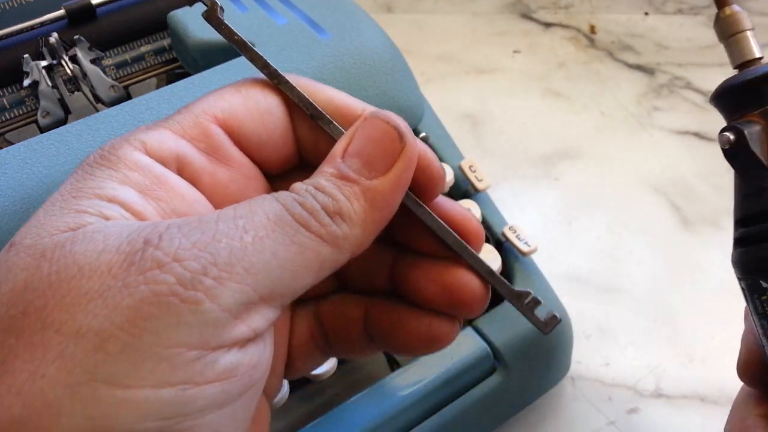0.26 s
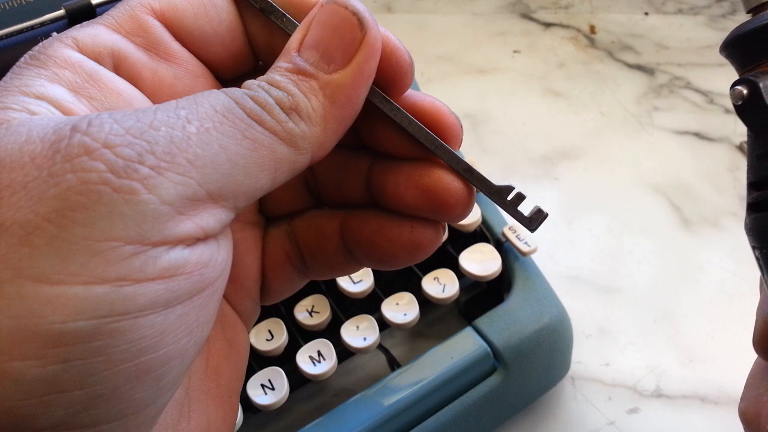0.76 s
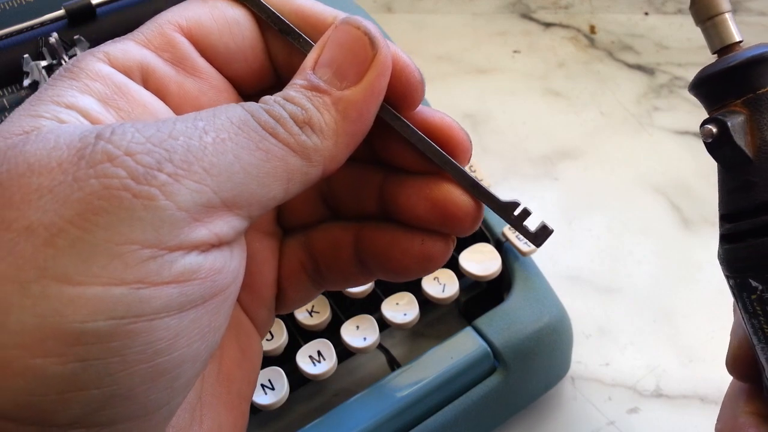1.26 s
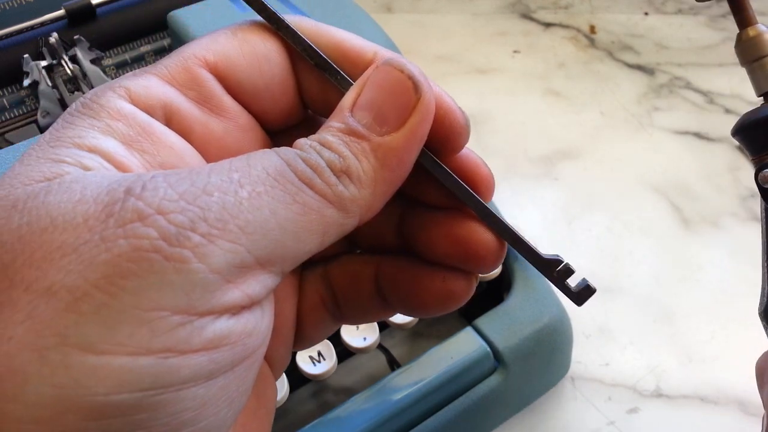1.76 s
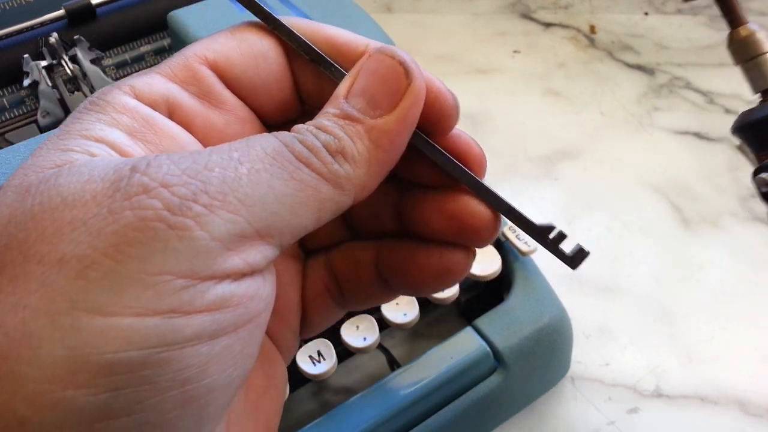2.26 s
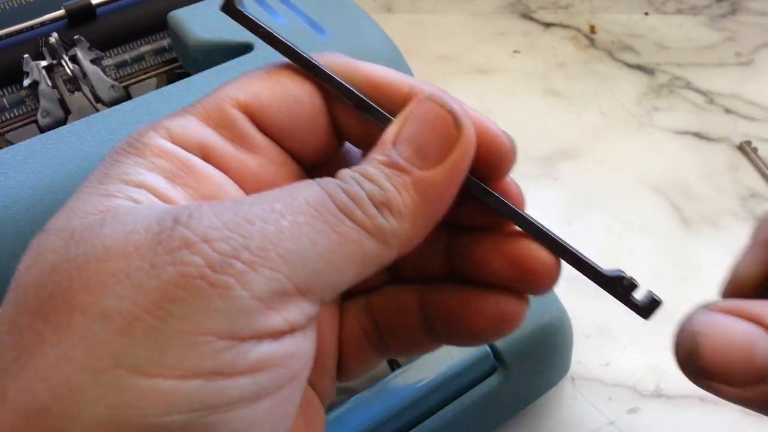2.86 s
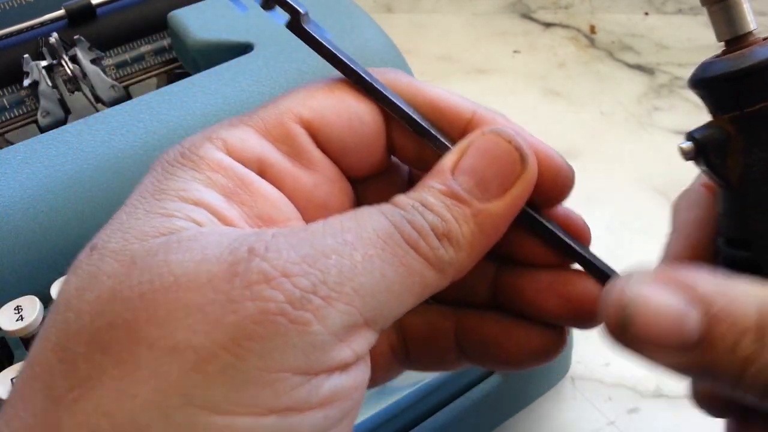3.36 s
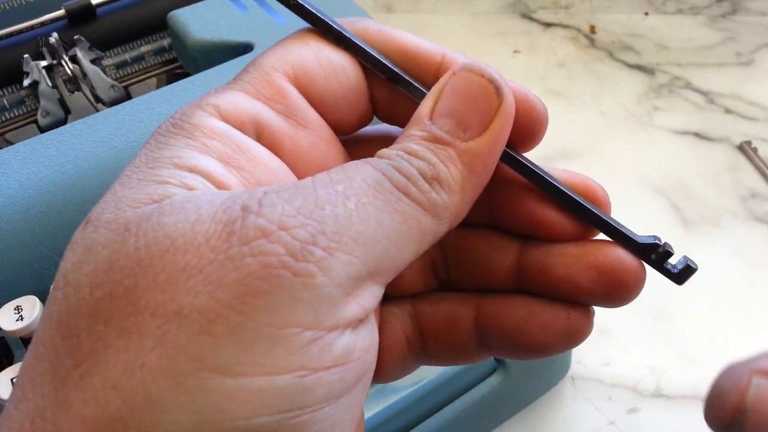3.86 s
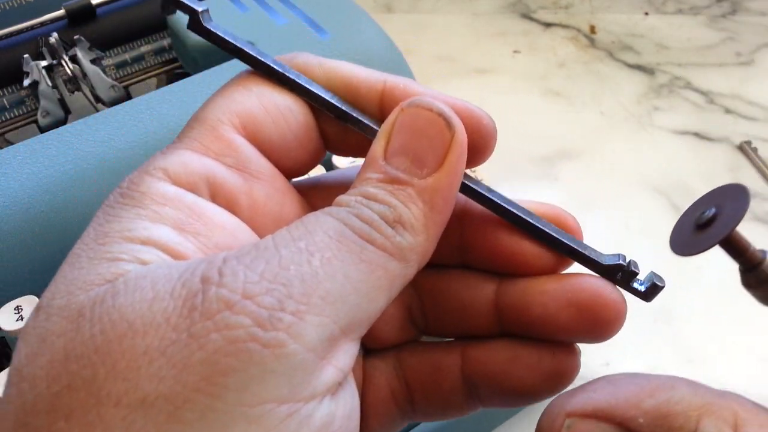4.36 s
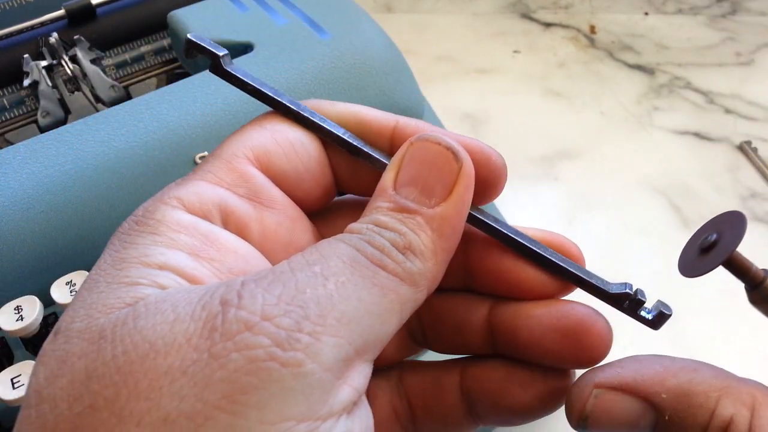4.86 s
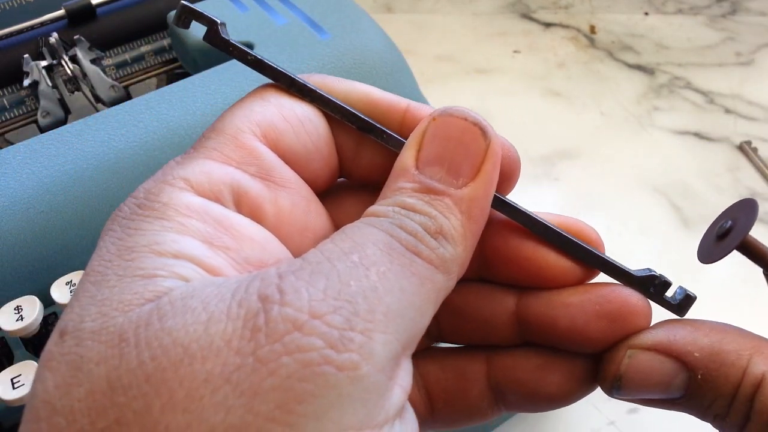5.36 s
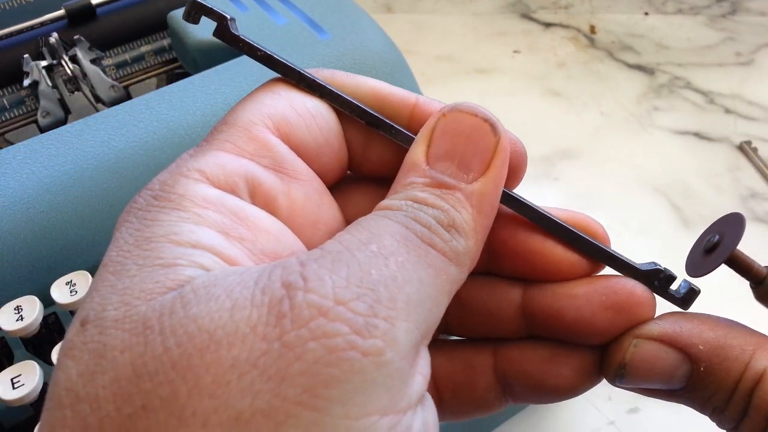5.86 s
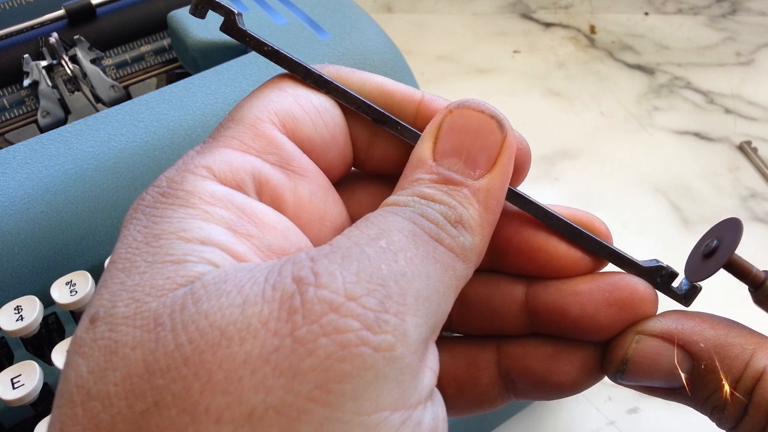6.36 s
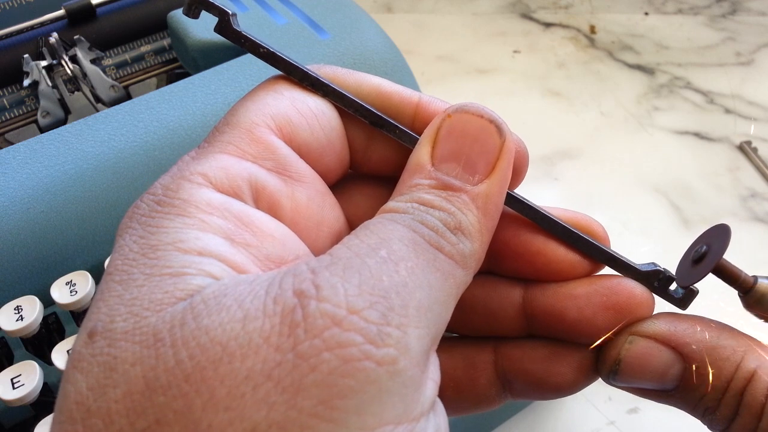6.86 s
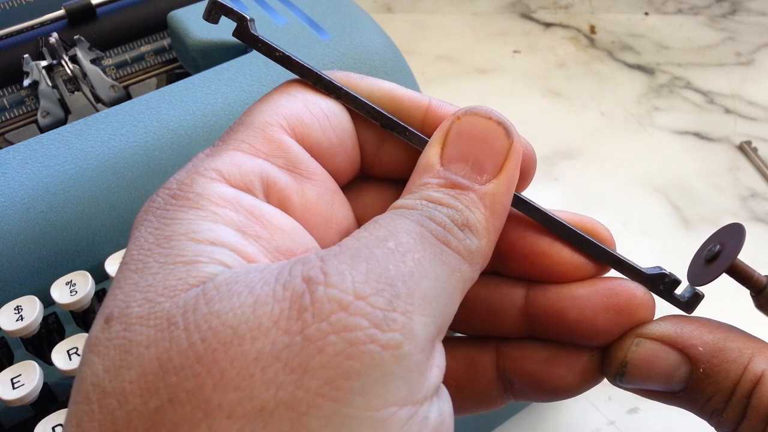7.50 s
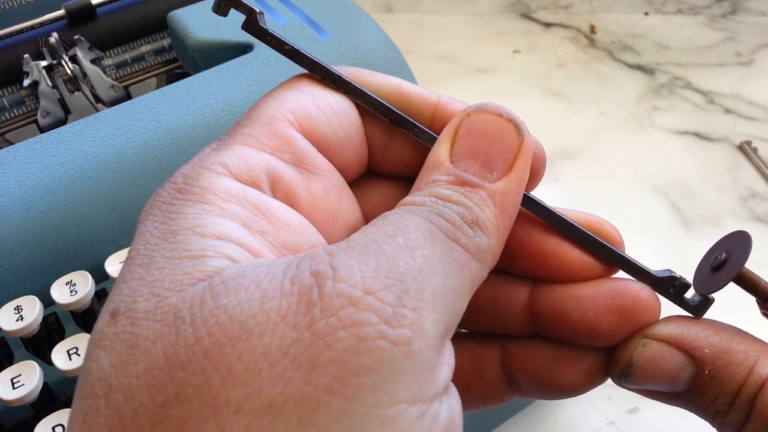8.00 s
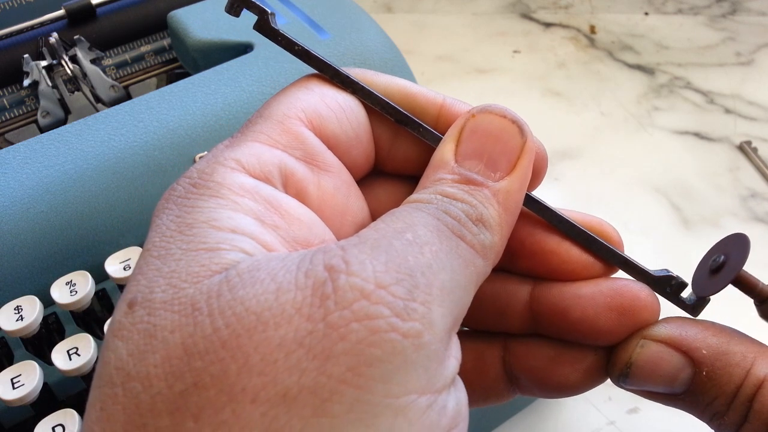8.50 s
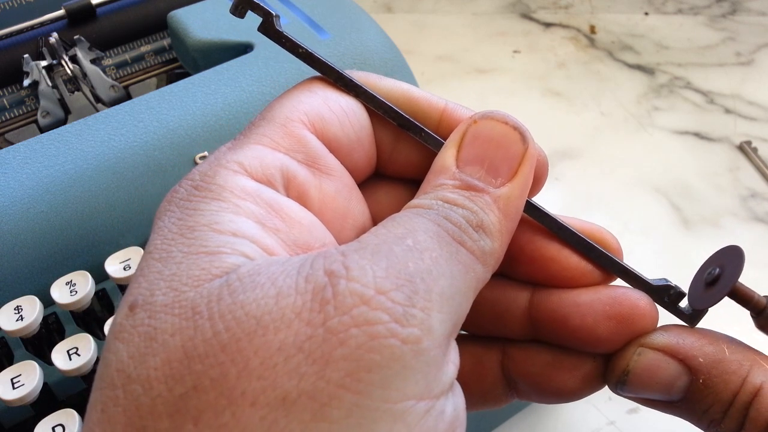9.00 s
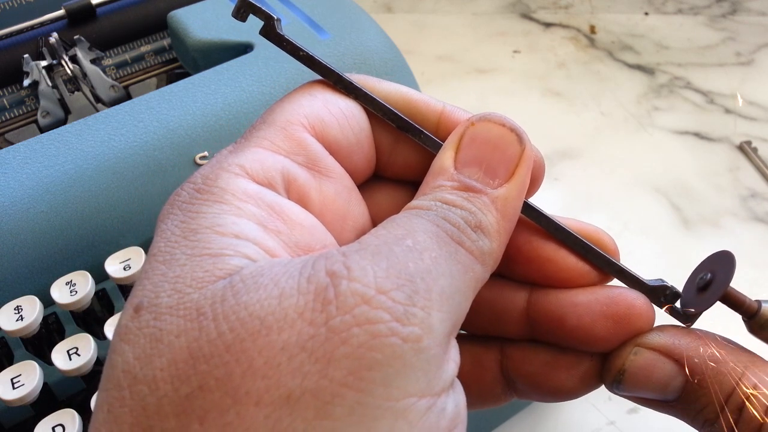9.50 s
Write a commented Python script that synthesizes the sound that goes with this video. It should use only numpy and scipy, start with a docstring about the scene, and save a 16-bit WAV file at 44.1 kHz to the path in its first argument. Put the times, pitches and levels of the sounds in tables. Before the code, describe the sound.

A small rotary tool whirs up to a high whine with airy hiss and gusty buffeting, then grinds thin steel in short rasping, pitch-dropping bites.

```python
"""A small rotary tool with an abrasive disc is switched on close to a two-port microphone and runs up to speed:
whines are sines locked to the turning shaft, and the rush of air is noise in narrow bands, over a faint rumble.
During the run-up, the jet of its cooling fan sweeps twice over the left port as bursts of lumpy low noise.
The tool idles, its rush wavering, and is then pressed again and again onto a thin steel bar, which slows it:
blows of the disc, once a turn, and grit ring the bar and the disc."""
import sys
import numpy as np
from scipy import signal
from scipy.io import wavfile

SR = 44100
rng = np.random.default_rng(int(sys.argv[2]) if len(sys.argv) > 2 else 0)


def dump_mix(stems):
    """Bounce the given channels to the path in sys.argv[1] as a 16-bit WAV at rate SR."""
    frames = np.atleast_2d(stems).T  # one column per channel
    limited = np.clip(frames, -1, 1)  # hard clip at full scale
    pcm = np.round(limited * 32767).astype(np.int16)
    wavfile.write(sys.argv[1], SR, pcm)


N = 429534

# Speed that the dial asks for: t/s, speed/(turns per s)
DIAL = [(0, 248.4), (0.82, 387.4), (1.11, 363.1), (1.86, 365), (2.11, 476.9), (2.65, 450.6), (6.19, 446.5)]
# Braking by the steel, below zero where the motor surges as the pressure lets go:
# t/s, speed taken off the dial's/(turns per s)
DRAG = [(6.19, 0), (6.41, 4.6), (6.51, 37.1), (7.04, 166.1), (7.22, 102.6), (7.38, 141.9), (7.51, -14.4),
        (7.73, -4.3), (7.93, 159.9), (8.13, 37.3), (8.36, 56), (8.5, -21), (8.69, 107.8), (8.92, 42.9),
        (9.21, 150.5), (9.48, 130.5), (9.63, 220.1), (9.74, 195.1)]
START_TURNS_PER_S, INERTIA_S = 128.6, 0.92
LOADED_TURNS_PER_S = 8  # speed lost when the whines have fully changed to their loaded levels

# Strong whines, as multiples of the shaft speed:
# unbalance, its overtones, a bearing, commutator, a second bearing, fan blades
WHINE_ORDERS = [1, 2, 3, 3.445, 8, 14.086, 18]
# Left minus right of each strong whine: level/dB
WHINE_PAN_DB = [-1.5, -1, -7, 4, 3.5, 10, 8]
# Speeds at which the strong whines are listed: speed/(turns per s)
WHINE_SPEEDS = [130, 215, 253, 272, 298, 320, 340, 358, 375, 394, 405, 413, 433, 439, 443, 445, 447]
# Strong whines running free, as the housing resonates; a row for each speed, a column for each whine: level/dB
FREE_WHINES = [(-71, -68, -68, -66, -56, -64, -65), (-52, -57, -56, -61, -47, -52, -48),
               (-47.5, -51, -51, -49, -45, -42, -38), (-42.5, -63, -41, -37, -25, -38, -33),
               (-35, -65, -37, -28.5, -24, -30.5, -35), (-39, -63, -43, -35, -29, -33, -34),
               (-37, -65, -65, -31.5, -28, -34, -21), (-42, -56, -41, -22.5, -35, -26, -21),
               (-36, -36, -62, -36, -41, -35, -18), (-34.5, -62, -62, -28.5, -33, -42, -20),
               (-31, -40, -33, -24, -33, -41, -17.5), (-28.5, -40, -30, -18, -41, -35, -24),
               (-24.5, -31, -28, -28.5, -27.5, -43, -20.5), (-26, -37, -33.5, -20, -32.5, -46, -26),
               (-26, -40.5, -29.5, -26.5, -27.5, -31, -25), (-27.5, -41, -26.5, -30, -30.5, -39, -34.5),
               (-30, -38.5, -29, -25.5, -25.5, -39, -25.5)]
# Strong whines while the steel brakes the shaft: t/s, then a column for each whine: level/dB
LOADED_WHINES = [(6.45, -38, -40.5, -31, -21, -33, -44.0, -42),
                 (6.7, -33.5, -39, -31.5, -26.5, -32, -44.0, -26),
                 (6.9, -42.0, -40, -38.5, -30, -40, -35, -40), (7.1, -39.5, -43, -39, -31, -45, -36, -44),
                 (7.35, -39, -26, -41, -34, -46, -46, -37), (7.551, -41.5, -39, -47, -28, -39, -55.5, -44),
                 (7.801, -35.5, -38.5, -32, -17.5, -34, -49, -37),
                 (8.05, -41, -34.5, -52, -29, -42, -46.0, -42),
                 (8.3, -40.5, -39.5, -30, -32.5, -43, -38, -46),
                 (8.45, -38, -36.5, -37, -23, -39, -46.0, -42),
                 (8.65, -38.5, -39, -35, -20.5, -30, -50, -37), (8.9, -37, -43, -42, -21.5, -41, -47, -39),
                 (9.15, -38.5, -37, -46, -25.5, -32, -48, -31),
                 (9.4, -47.5, -41.5, -38.0, -35.5, -45, -36, -31),
                 (9.65, -51, -38, -43, -33, -45.5, -41, -34)]
# Quick wavering of each strong whine: spread/dB
WHINE_FLUTTER_DB = [1.14, 2.4, 1.5, 1.38, 3.24, 1.4, 1.83]

# Faint whines, as multiples of the shaft speed
FAINT_ORDERS = [4, 5, 6, 6.445, 6.89, 7.227, 7.62, 8.4, 8.88, 9, 9.12, 9.44, 9.89, 10.656, 11, 13, 13.36,
                16, 16.8, 17.52, 20.227, 20.94, 21.33, 24, 27]
# Speeds at which the faint whines are listed: speed/(turns per s)
FAINT_SPEEDS = [208, 265, 310, 345, 372, 398, 425, 440, 446]
# A row for each faint whine: nine columns of level/dB at those speeds, level under load/dB, left minus right/dB
FAINT_WHINES = [(-58, -51, -60, -44, -55, -45, -35, -37, -41, -57, 3),
                (-60, -60, -47, -54, -60, -54, -41, -39, -38, -50, 0),
                (-56, -50, -46, -45, -42, -46, -40, -43, -41, -45, 1),
                (-44, -46, -40, -35, -31, -27, -36, -42, -43, -35, 3),
                (-43, -47, -42, -37, -37, -37, -44, -57, -51, -47, 5),
                (-55, -47, -34, -26, -31, -57, -40, -37, -45, -41, 4),
                (-60, -44, -38, -28, -52, -47, -60, -60, -60, -60, -1),
                (-57, -32, -34, -41, -57, -41, -40, -37, -43, -51, 7),
                (-60, -32, -47, -60, -60, -52, -60, -60, -59, -60, -8),
                (-44, -42, -46, -56, -56, -40, -43, -38, -49, -45, 7),
                (-48, -60, -55, -53, -44, -38, -40, -45, -47, -41, -7),
                (-59, -35, -45, -47, -37, -31, -35, -35, -41, -39, 0),
                (-53, -40, -52, -38, -37, -35, -34, -34, -40, -40, 2),
                (-45, -60, -45, -49, -42, -28, -40, -51, -54, -44, 1),
                (-53, -54, -48, -41, -51, -42, -40, -39, -44, -41, 2),
                (-60, -51, -60, -46, -46, -37, -50, -47, -48, -55, 0),
                (-52, -41, -41, -42, -42, -36, -39, -43, -49, -45, 4),
                (-42, -42, -42, -43, -40, -43, -40, -41, -41, -47, 3),
                (-48, -43, -46, -48, -46, -33, -39, -35, -37, -45, -1),
                (-39, -40, -59, -37, -39, -42, -37, -37, -40, -53, 0),
                (-50, -53, -47, -41, -37, -42, -40, -39, -42, -40, 2),
                (-60, -41, -37, -35, -38, -37, -37, -39, -44, -42, 2),
                (-60, -60, -58, -60, -60, -54, -49, -39, -44, -50, 2),
                (-60, -46, -38, -41, -39, -41, -47, -49, -45, -41, 4),
                (-60, -43, -47, -48, -46, -44, -39, -46, -49, -48, 6)]
FAINT_WAVER_DB = 4.0
FAINT_BLUR_RAD = 0.02  # wandering of the shaft angle as each faint whine sees it
FAINT_FROM_SPEED, FAINT_DB_PER_SPEED = 185, 0.3  # they die away below this speed (turns per s)

# Rush of cooling air and brushes, before wavering and dips: t/s, middle band level/dB
AIR = [(0.02, -47), (0.08, -42), (0.19, -31.5), (0.43, -29), (0.52, -24.5), (0.87, -29), (1.0, -27),
       (1.35, -22.5), (1.83, -26.5), (2.11, -22), (2.35, -24), (2.6, -20.5), (3.41, -21.5), (3.97, -22),
       (4.3, -25.5), (6.4, -25), (7.0, -27.5), (7.33, -26), (7.59, -28), (7.79, -24.5), (8.03, -26.5),
       (8.5, -25.5), (8.8, -26.5), (9.71, -28)]
# Its other bands against the middle one, as the tool turns in the hand:
# t/s, low level/dB, vent resonance level/dB, high level/dB
AIR_TONE = [(0.02, 7, -4, -5.5), (0.19, -4.5, -2, -3.5), (0.52, -4.5, -5, -1), (1.35, -3, -5.5, 2.5),
            (2.11, -2.5, -3, 1), (2.41, -1, -6.5, 0), (2.62, -3, -2.5, 0), (3.41, -0.5, -8, 1),
            (4.5, -2, -4, 1), (6.4, -2.5, -5, 2), (9.71, -1, -4, 3.5)]
# Where the vents point, counted from the average: t/s, left minus right level/dB
AIR_PAN = [(0.02, 1.5), (0.51, 4), (1.43, 3), (2.14, 4.5), (3.18, 1.5), (3.61, 4.5), (4.08, 0.5),
           (5.49, -0.5), (7.23, 2), (9.71, 4)]
# Colour of the rush inside each band:
# f/Hz, relative level in each Hz/dB, left minus right level/dB, left-right likeness (0 to 1)
AIR_COLOUR = [(151, -52, -8, 0.34), (292, -2, -15.5, 0.94), (490, 2, 3.5, 0.53), (710, 12.5, -1, 1),
              (1180, 9, 5, 0.37), (1490, 14.5, 1, 0.78), (2504, 18, 0.5, 0.058), (2840, -4, -3, 1),
              (3600, 13, 5.5, 0.067), (4640, 1.5, -0.5, 0.055), (5630, 10.5, 9.5, 0.084),
              (7570, 11.5, -3.5, 0.018), (10300, 7.5, 6, 0.027), (12520, 6, 8.5, 0.03),
              (14600, -28, -8, 0.45)]
# Borders between the low, vent, middle and high bands: f/Hz
AIR_SPLIT_HZ = [1800, 2750, 5500]
# The rush wavers while the tool idles
WAVER_FROM_S, WAVER_TO_S, WAVER_PERIOD_S, WAVER_DB = 4.43, 6.27, 0.344, 1.17
# Low, vent, middle and high band dip by this share of the loudest touch level above the mark
DIP_SHARES, DIP_FROM_DB = [0.26, 0.39, 0.23, 0.071], -24.5

# Stretches in which the faint low noise has no gaps: from t/s, to t/s
RUMBLE_UNBROKEN = [(0, 2.4), (5.719, 7), (7.12, 7.55)]
RUMBLE_HZ, RUMBLE_DB = (76.3, 102), -51.5

# Gusts of the fan jet on the left port: start t/s, held t/s, level/dB
GUSTS = [(0.25, 1.0, -41), (0.49, 0.15, -36), (1.25, 0.023, -35), (1.39, 0.17, -12.5), (1.61, 0.099, -10),
         (1.72, 0.13, -12), (1.9, 0.15, -36.5), (2.1, 0.028, -21), (2.18, 0.067, -21.5), (2.26, 0.083, -16),
         (2.38, 0.13, -17.5), (5.1, 0.074, -41)]
GUST_RISE_DB_PER_S, GUST_FALL_DB_PER_S = 354, 380
JET_HZ, JET_LUMPS_DB = (118, 335), 4.5

# Touches of the disc on the steel: start t/s, held t/s, five groups of modes from low to high: level/dB
TOUCHES = [(6.245, 0.046, -26, -19.5, -24, -20, -22), (6.44, 0.032, -21, -21, -20, -23, -21),
           (6.505, 0.031, -33, -30, -23, -17, -20), (6.64, 0.081, -42, -24.5, -25, -19, -22),
           (6.78, 0.087, -25, -21, -22, -17.5, -22), (6.88, 0.17, -27.5, -31, -28, -16, -29),
           (7.11, 0.031, -29, -22, -28, -25, -24), (7.16, 0.015, -36, -22, -40.0, -23, -22),
           (7.28, 0.19, -26.5, -36, -36, -29, -32), (7.81, 0.095, -27, -26.5, -31, -29, -29),
           (7.935, 0.036, -24, -24.5, -30, -19.5, -29.0), (8.155, 0.04, -27, -21, -21, -18.5, -23),
           (8.205, 0.044, -16.5, -19, -22, -30, -25), (8.28, 0.14, -17.5, -23, -20.5, -24, -25),
           (8.43, 0.02, -27, -24, -32, -38, -33.0), (8.62, 0.045, -38, -23.5, -35, -24, -25),
           (8.68, 0.035, -40, -26.5, -28, -19, -25), (8.8, 0.019, -29, -25, -31, -24, -29),
           (8.97, 0.054, -32, -23.5, -37, -27.0, -32), (9.08, 0.14, -26, -24, -36, -22, -26.0),
           (9.25, 0.18, -29, -19, -26, -17.5, -21), (9.36, 0.066, -23, -22, -39, -18.5, -23.5),
           (9.45, 0.052, -28, -25, -40, -29, -17), (9.51, 0.057, -39, -21.0, -30.0, -21.5, -24),
           (9.58, 0.082, -25.5, -25, -28, -22, -26.0), (9.66, 0.11, -19.5, -23.5, -32, -20.5, -26)]
TOUCH_RISE_DB_PER_S, TOUCH_FALL_DB_PER_S = 798, 500
# Where the disc rasps instead of cutting clean: start t/s, held t/s, grit against the blows: level/dB
RASPS = [(7.26, 0.3, -2), (8.15, 0.1, -13)]
# Modes (ringing tones) of the hand-held bar and the disc, levels counting within a group:
# f/Hz, width/Hz, left level/dB, right level/dB
STEEL_MODES = [(3470, 640, 5.5, 3.5), (3870, 560, 9, -26), (4265, 230, 4.5, 0.5), (4780, 420, 15.5, 8.5),
               (5200, 380, 1, 13), (6720, 770, 4.5, -2), (7930, 1500, -20, 6), (9260, 570, -26, 9),
               (10270, 990, 14.5, 7), (12620, 2500, 3.5, -16), (14740, 780, 16, 8)]
# Borders between the five groups of modes: f/Hz
STEEL_SPLIT_HZ = [4400, 5800, 8500, 11500]
GRIT_DB, UNEVEN_DB = -22, 2.8  # least grit against the blows; wavering of each overtone
SMEAR_RAD, WOBBLE_RAD = 1.2, 0.3  # overtone phases: spread, as the high spot is broad; wandering

RIGHT_LAG_S = 0.00023  # the tool is nearer to the left port
CUTOFF_HZ = 14520


def amp(db):
    """Turn a level in dB into a gain."""
    return 10 ** (np.asarray(db) / 20)


def rms_one(x):
    """Scale to an rms (average strength) of 1."""
    return x / np.sqrt(np.mean(x ** 2) + 1e-20)


def in_time(rows):
    """Draw straight lines between the rows of a table, sample by sample, for each column after the time."""
    time_s, *columns = np.transpose(rows)
    return [np.interp(np.arange(N) / SR, time_s, column) for column in columns]


def bursts(rows, rise_db_per_s, fall_db_per_s):
    """Levels in dB, column by column: each row rises, holds and falls; the loudest one counts."""
    now = np.arange(0, N + 40, 40) / SR  # every 40th sample is enough
    start, held, *columns = np.transpose(rows)[:, :, None]
    before = rise_db_per_s * (start - now)
    after = fall_db_per_s * (now - start - held)
    under = np.maximum(0, np.maximum(before, after))
    loudest = [np.max(column - under, axis=0) for column in columns]
    return [np.interp(np.arange(N) / SR, now, level_db) for level_db in loudest]


def drift(rate_hz):
    """Slow chance of spread 1: noise smoothed twice by a one-pole low-pass, at every 40th sample."""
    r = np.exp(-80 * np.pi * rate_hz / SR)
    noise = rng.standard_normal(N // 40 + 2002)
    slow = signal.lfilter([1], [1, -2 * r, r * r], noise)[2000:]  # leave out the filter's start
    return np.interp(np.arange(N) / 40, np.arange(len(slow)), rms_one(slow))


def band(x, low_hz, high_hz):
    """Keep the sound between two frequencies, with gentle edges."""
    return signal.sosfilt(signal.butter(2, [low_hz, high_hz], "band", fs=SR, output="sos"), x)


def resonance(x, hz, width_hz):
    """Ring at one frequency with gain 1 on top; a narrower width rings longer."""
    r = np.exp(-np.pi * width_hz / SR)
    feedback = [1, -2 * r * np.cos(2 * np.pi * hz / SR), r * r]
    return signal.lfilter([(1 - r * r) / 2, 0, (r * r - 1) / 2], feedback, x)


def panned(x, pan_db):
    """Left and right with the given level difference."""
    return np.array([x * amp(pan_db / 2), x * amp(-pan_db / 2)])


def shaft(asked):
    """The shaft speed follows the speed asked of it with the lag of its inertia."""
    r = np.exp(-1 / (INERTIA_S * SR))
    return signal.lfilter([1 - r], [1, -r], asked, zi=[START_TURNS_PER_S])[0]


def whine(angle, order):
    """A sine of rms 1 that repeats 'order' times in each turn of the shaft."""
    return np.sqrt(2) * np.sin(order * angle + rng.uniform(0, 2 * np.pi))


def strong_whines(angle, speed, loaded):
    """Each part of the motor whines at a level set by speed when running free, and by time under load."""
    out = 0
    for order, free_db, braked_db, flutter_db, pan_db in zip(
            WHINE_ORDERS, np.transpose(FREE_WHINES), in_time(LOADED_WHINES), WHINE_FLUTTER_DB, WHINE_PAN_DB):
        level_db = (1 - loaded) * np.interp(speed, WHINE_SPEEDS, free_db) + loaded * braked_db
        gain = amp(level_db + flutter_db * drift(13.3))
        out = out + panned(gain * whine(angle, order), pan_db)
    return out


def faint_whines(angle, speed, loaded):
    """Weaker whines follow a slightly wandering shaft angle and die away at low speed."""
    out = 0
    slow_db = FAINT_DB_PER_SPEED * np.maximum(0, FAINT_FROM_SPEED - speed)
    for order, (*free_db, braked_db, pan_db) in zip(FAINT_ORDERS, FAINT_WHINES):
        level_db = (1 - loaded) * np.interp(speed, FAINT_SPEEDS, free_db) + loaded * braked_db - slow_db
        gain = amp(level_db + FAINT_WAVER_DB * drift(6.0))
        blurred_angle = angle + FAINT_BLUR_RAD * drift(22.0)
        out = out + panned(gain * whine(blurred_angle, order), pan_db)
    return out


def rush_levels(over_db):
    """Levels of the four air bands: they waver while idling and dip during strong touches."""
    now, (level_db,) = np.arange(N) / SR, in_time(AIR)
    idling = (now > WAVER_FROM_S) & (now < WAVER_TO_S)
    level_db = level_db + idling * WAVER_DB * np.sin(2 * np.pi * (now - WAVER_FROM_S) / WAVER_PERIOD_S)
    low, vent, high = in_time(AIR_TONE)
    return [level_db + tone_db - share * over_db for tone_db, share in zip([low, vent, 0, high], DIP_SHARES)]


def air_rush(angle, levels_db, pan_db, patchy_db, beat):
    """Third-octave bands of noise, partly common to both ports, pulsing a little with every turn."""
    hz, density_db, tilt_db, alike = np.transpose(AIR_COLOUR)
    edges = 110 * 2 ** (np.arange(23) / 3)
    groups = np.zeros((4, 2, N))
    white = rng.standard_normal((2, 3, N))  # neighbouring bands get unrelated noise
    together = drift(16.0)
    for k, (low, high) in enumerate(zip(edges, edges[1:])):
        common, left, right = band(white[k % 2], low, high)
        middle = np.log(low * high) / 2
        share = np.clip(np.interp(middle, np.log(hz), alike), 0, 1)
        both = np.sqrt(share) * common + np.sqrt(1 - share) * np.array([left, right])
        patches_db = patchy_db * (0.5 * together + drift(6.8))
        gain = amp(np.interp(middle, np.log(hz), density_db) + patches_db)
        tilt = np.interp(middle, np.log(hz), tilt_db)
        groups[np.searchsorted(AIR_SPLIT_HZ, low)] += both * panned(gain, tilt)
    rush = sum(amp(level_db) * rms_one(group) for level_db, group in zip(levels_db, groups))
    return rush * panned(1 + beat * np.cos(angle), pan_db - np.mean(pan_db))


def rumble():
    """Faint low rumble at both ports: band-passed noise, with random gaps outside the unbroken stretches."""
    now = np.arange(N) / SR
    unbroken = sum((now > start) & (now < end) for start, end in RUMBLE_UNBROKEN)
    audible = np.array([np.maximum(unbroken, drift(4) > 1.1) for port in range(2)])
    return amp(RUMBLE_DB) * rms_one(band(audible * rng.standard_normal((2, N)), *RUMBLE_HZ))


def fan_jet():
    """The jet breaks on the left port as gusts of lumpy low noise."""
    level_db, = bursts(GUSTS, GUST_RISE_DB_PER_S, GUST_FALL_DB_PER_S)
    lumps = amp(JET_LUMPS_DB * drift(39)) * rng.standard_normal(N)
    jet = amp(level_db) * rms_one(band(lumps, *JET_HZ))
    return jet * [[1], [0]]


def grinding(angle, touch_db):
    """The high spot of the disc hits the steel once a turn, with grit that swells once a turn; both ring the modes."""
    blows = 0
    for k in range(4, 44):  # overtones of the turning rate
        phase = SMEAR_RAD * rng.standard_normal() + WOBBLE_RAD * drift(10.0)
        blows = blows + amp(UNEVEN_DB * drift(27.0)) * np.cos(k * angle + phase)
    grit = rng.standard_normal(N) * (1 + np.cos(angle)) ** 2
    grit_db = np.maximum(GRIT_DB, *bursts(RASPS, TOUCH_RISE_DB_PER_S, TOUCH_FALL_DB_PER_S))
    contact = rms_one(blows) + amp(grit_db) * rms_one(grit)
    groups = np.zeros((5, 2, N))
    for k, (hz, width_hz, left_db, right_db) in enumerate(STEEL_MODES):
        ring = resonance(resonance(contact, hz, width_hz), hz, 2 * width_hz)
        sign = (-1) ** k  # every other mode is turned upside down
        groups[np.searchsorted(STEEL_SPLIT_HZ, hz)] += sign * ring * amp([[left_db], [right_db]])
    return sum(amp(level_db) * rms_one(group) for level_db, group in zip(touch_db, groups))


def scene():
    """The tool reaches the right port a little late; jet and rumble act on the ports directly."""
    (dial,), (drag,), (pan_db,) = in_time(DIAL), in_time(DRAG), in_time(AIR_PAN)
    speed = shaft(dial - drag)
    # 0 running free, 1 whines fully at their loaded levels
    loaded = np.clip((shaft(dial) - speed) / LOADED_TURNS_PER_S, 0, 1)
    unsteady_speed = speed * (1 + 0.000428 * drift(19.7))
    angle = 2 * np.pi * np.cumsum(unsteady_speed) / SR
    touch_db = bursts(TOUCHES, TOUCH_RISE_DB_PER_S, TOUCH_FALL_DB_PER_S)
    over_db = np.maximum(0, np.max(touch_db, axis=0) - DIP_FROM_DB)
    tool = strong_whines(angle, speed, loaded) + faint_whines(angle, speed, loaded)
    tool = tool + air_rush(angle, rush_levels(over_db), pan_db, patchy_db=1.6, beat=0.025)
    tool = tool + grinding(angle, touch_db)
    tool[1] = np.pad(tool[1], (round(RIGHT_LAG_S * SR), 0))[:N]
    return tool + rumble() + fan_jet()


def record(dry):
    """Peaks clip at full scale, then a steep low-pass cuts the top."""
    clipped = np.clip(dry, -1, 1)
    return signal.sosfilt(signal.ellip(12, 0.5, 80, CUTOFF_HZ, fs=SR, output="sos"), clipped)


dry = scene()
out = record(dry)
dump_mix(out)
```